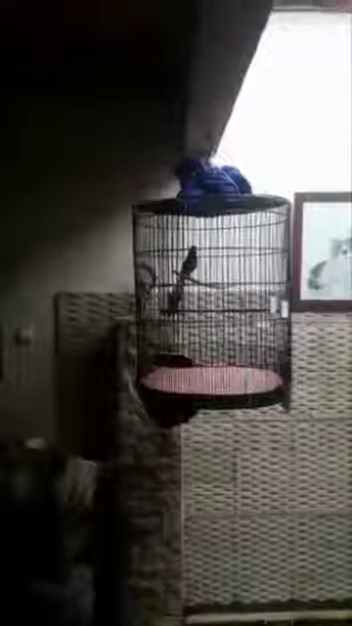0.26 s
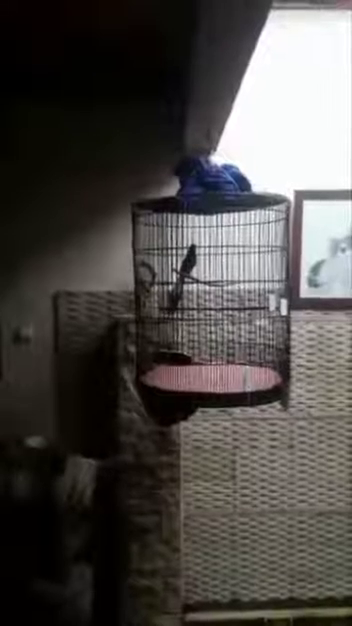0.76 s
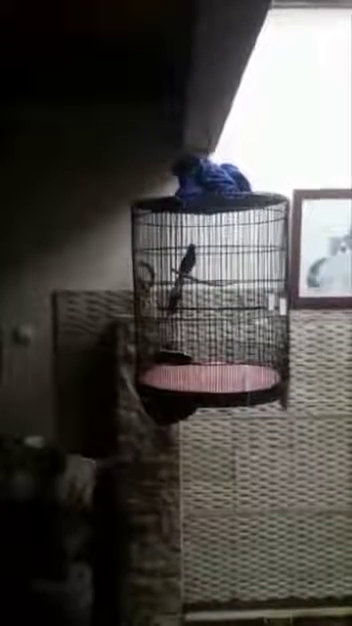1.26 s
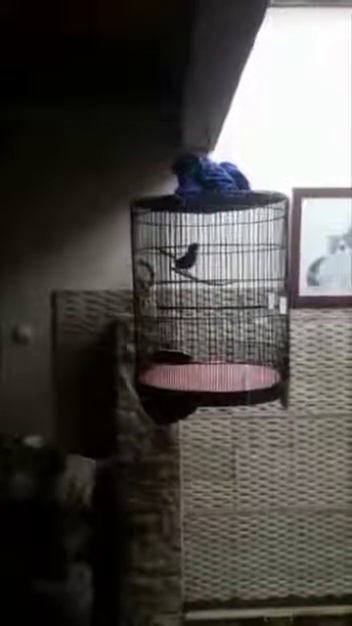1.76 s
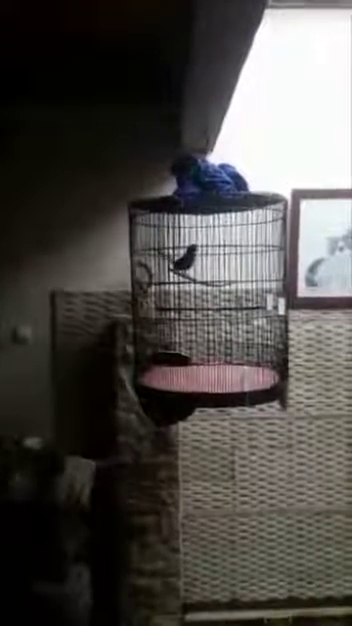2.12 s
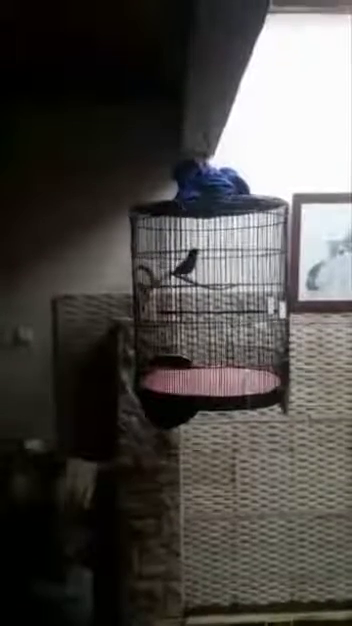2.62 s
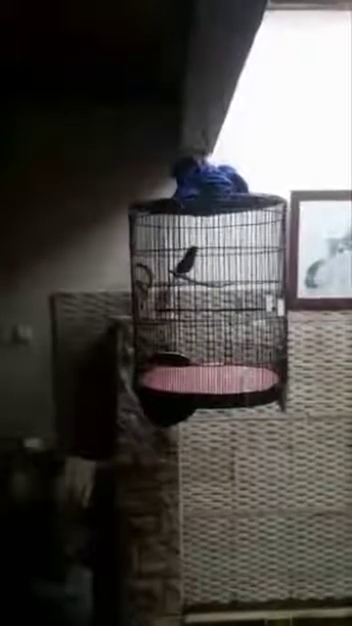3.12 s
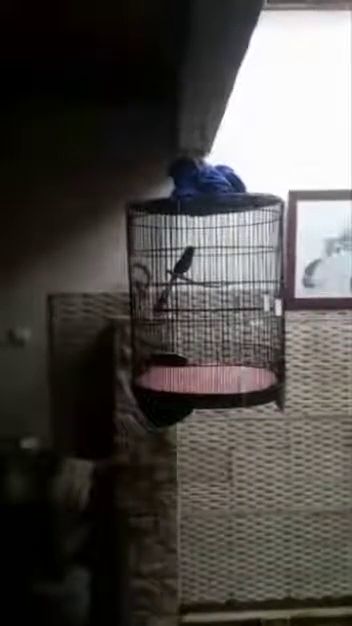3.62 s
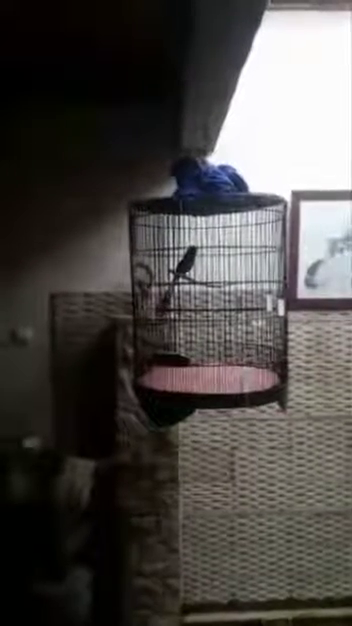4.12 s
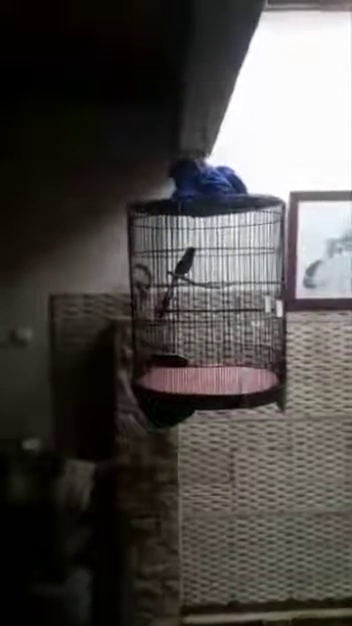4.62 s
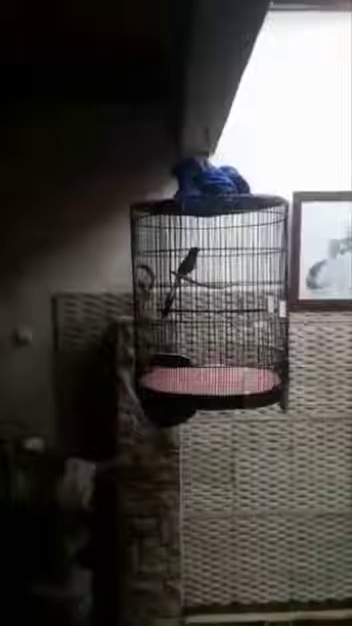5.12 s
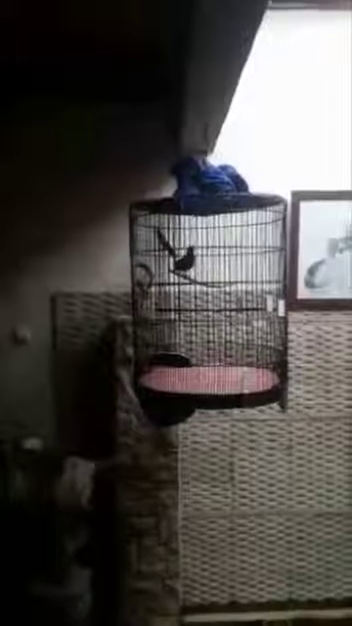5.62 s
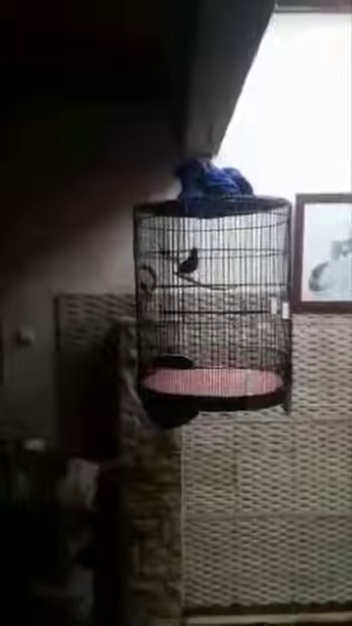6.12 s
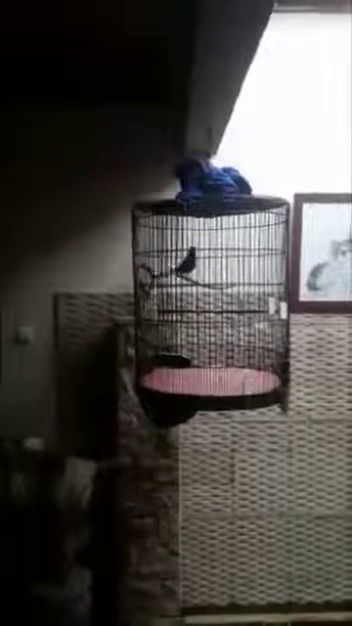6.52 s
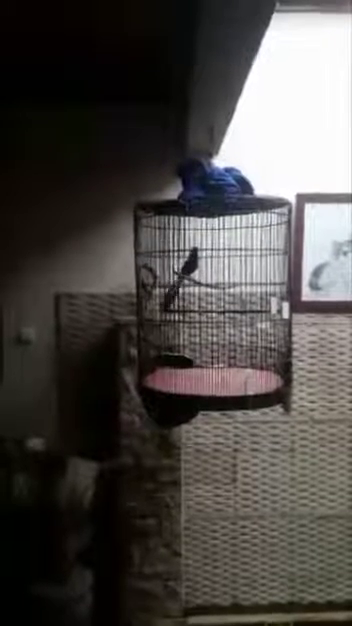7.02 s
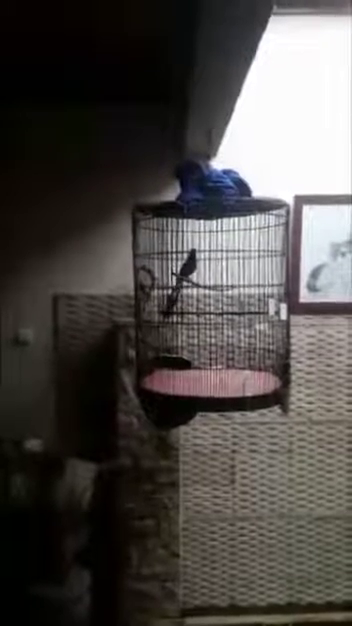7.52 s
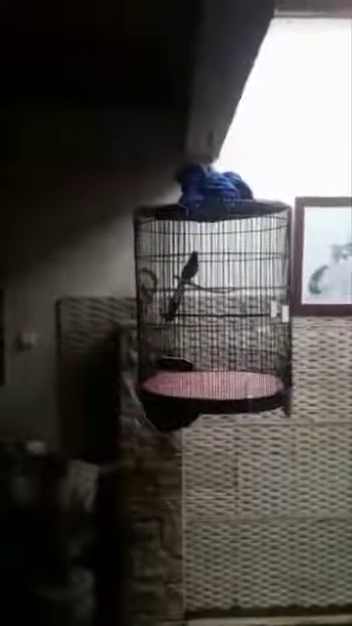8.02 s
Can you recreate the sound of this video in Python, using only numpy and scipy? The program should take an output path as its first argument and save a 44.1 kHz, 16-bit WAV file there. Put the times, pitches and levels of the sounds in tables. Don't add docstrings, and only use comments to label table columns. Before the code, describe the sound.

In a bare, echoing room a caged bird sings loudly, picked up by a phone across the room. From 0 to 1 s it gives rapid yodelling whistles, three arching, scooping, upward-leaping phrases. A short gap follows, with a wooden knock and faint distant bird notes. From 1.8 to 2.8 s comes a rattle of eleven bright chirps, about eleven a second, each falling steeply from high to middle pitch. Sliding whistles swoop and climb from 2.8 to 3.5 s, then quick leaping phrases run from 3.7 to 4.7 s, with a tiny click near 4.3. A dull perch knock lands at 5.1. A second rattle of twelve chirps fills 5.5 to 6.6 s. Swoops and yodels return from 6.7 to the end at about 8.3 s, with bright wire ticks around 7.7 and 8.2. Underneath lie soft hiss, low household hum, a very faint whine, traffic and a distant engine changing speed.

```python
import sys
import numpy as np
from scipy import signal
from scipy.fft import rfft, irfft, next_fast_len
from scipy.io import wavfile
from scipy.ndimage import uniform_filter1d, minimum_filter1d, map_coordinates

SR = 44100
rng = np.random.default_rng(int(sys.argv[2]) if len(sys.argv) > 2 else 0)


def natural_amplitude(level_db):
    exponent = np.asarray(level_db, float) / 20
    return 10 ** exponent


def store_wav(level_fs):
    pcm = np.round(np.clip(np.atleast_2d(level_fs), -1, 1) * 32767)
    wavfile.write(sys.argv[1], SR, pcm.T.astype(np.int16))


N = 364266


def unit(x):
    return x / np.sqrt(np.mean(x ** 2) + 1e-20)


def along(points, hz):
    f, v = np.transpose(points)
    return np.interp(np.log(hz + 1), np.log(f + 1), v)


def coloured(x, points):
    m = next_fast_len(x.shape[-1] + 8192)
    gain = natural_amplitude(along(points, np.fft.rfftfreq(m, 1 / SR)))
    return irfft(rfft(x, m) * gain, m)[..., :x.shape[-1]]


def add(out, s, x):
    part = out[:, max(round(s * SR), 0):][:, :x.shape[1]]
    part += x[:, :part.shape[1]]


# (pitch [Hz], time to fade by 60 dB [s])
RING_TIME = [(200, 0.22), (1000, 0.6), (2500, 0.68), (5000, 0.61), (12000, 0.62)]
# (delay [s], level under the direct sound [dB])
WALL_ECHOES = [
    (.017, -5),
    (.038, -8),
]


def room(x, direct_db):
    noise = rng.standard_normal((2, 12001, 2)) @ [1, 1j]
    modes = unit(uniform_filter1d(rng.standard_normal(noise.shape[1]), size=12))
    hz, t, z = signal.stft(irfft(noise * natural_amplitude(2.5 * modes)), SR, nperseg=256)
    fade = natural_amplitude(-60 * t / along(RING_TIME, hz)[:, None])
    tail = signal.istft(z * fade, SR, nperseg=256)[1]
    t = np.arange(tail.shape[1]) / SR
    tail *= 1 - np.exp(-t / 0.0011)
    tail *= 1 + 0.58 * np.exp(-t / 0.099)
    tail /= np.linalg.norm(tail[0])
    tail[0, 0] = natural_amplitude(direct_db)
    for s, db in WALL_ECHOES:
        tail[0, round(s * SR)] += natural_amplitude(direct_db + db)
    return signal.fftconvolve(x[None], tail, axes=1)


# (multiple of the pitch, level [dB])
VOICE_OVERTONES = [(2, -43), (3, -52.5), (4, -56.5)]
# (pitch [Hz], level [dB])
VOICE_AIR = [(300, -46), (600, -61), (1500, -31), (3500, -26.5), (5000, -40), (7000, -38), (9000, -30.5),
             (11000, -42), (13000, -69.5)]


def syrinx(hz, db, edge, harsh_db=0, air_db=0):
    phase = 2 * np.pi * np.cumsum(hz) / SR
    t = np.arange(len(hz)) / SR
    fade = np.clip(np.minimum(t, t[-1] - t) / edge, 0, 1)
    flutter = 1 + 1.18 * unit(uniform_filter1d(rng.standard_normal(len(t)), size=60))
    upper = 0
    for k, level_db in VOICE_OVERTONES:
        upper = upper + natural_amplitude(level_db) * np.sin(k * phase) * (k * hz < SR / 2)
    air = coloured(rng.standard_normal(len(t)), VOICE_AIR)
    return natural_amplitude(db) * fade * (np.sin(phase) + natural_amplitude(harsh_db) * flutter * upper + natural_amplitude(air_db) * air)


# (share of length, pitch [Hz], level [dB])
PICKUP_SHAPE = [(0, 824, -3), (.4, 986, -2), (.75, 1057, -8.5), (1, 1502, -8)]
CRY_SHAPE = [(0, 2376, 2.5), (.28, 2877, -13), (.5, 3023, 0.5), (.7, 2770, -5), (1, 2910, -9)]
ARCH_SHAPE = [(0, 1212, -12), (.14, 1626, -16.5), (.19, 1709, -2.5), (.3, 1755, -5.5), (.5, 1619, -3),
              (.68, 1356, -4), (.85, 937, -14), (1, 820, -41)]
HOOK_SHAPE = [(0, 1560, 5.5), (.4, 1882, -3), (1, 1880, -9.5)]
SCOOP_SHAPE = [(0, 874.4, -26), (.6, 1339, -11.5), (1, 1520, -11)]
STEP_SHAPE = [(0, 878, -23), (.6, 1398, -11.5), (1, 1440, -14.5)]
LEAP_SHAPE = [(0, 1650, -18.5), (.08, 1744, -8), (.3, 2340, 1.5), (.55, 2595, -4), (1, 2721, -17)]
LEAN_SHAPE = [(0, 1413, -30), (.25, 1524, -3.5), (1, 1590, -1)]
SWOOP_SHAPE = [(0, 1690, -6.5), (.08, 1773, -2), (.25, 2940, -18.5), (.45, 2344, -1), (.7, 2080, -2.5),
               (1, 1918, -4.5)]
CLIMB_SHAPE = [(0, 861, -32.5), (.27, 934, -26), (.31, 1069, -8), (.7, 1100, -13), (.8, 1269, -15.5),
               (1, 1358, -22)]
DROP_SHAPE = [(0, 1503, -3), (.4, 1253, -10.5), (1, 860, -4.5)]
RISE_SHAPE = [(0, 798, 0.0088), (1, 1005, 0.038)]
FALL_SHAPE = [(0, 996.5, 0.0079), (1, 778.4, 0.0024)]
HOLD_SHAPE = [(0, 979.8, 0.02), (1, 999.2, 0.052)]
GRACE_SHAPE = [(0, 7420, -10.5), (1, 6590, 13)]
# (time [s], length [s], level [dB], top pitch [Hz], swell toward the end [dB])
PICKUPS_SUNG = [(0.095, 0.039, -31.5, 1525, 9), (0.102, 0.065, -35, 3010, 4), (3.724, 0.03, -35, 2016, 4),
                (7.568, 0.036, -30, 1564, 5.5), (7.569, 0.05, -36, 3060, -6)]
CRIES_SUNG = [(0.139, 0.0267, -8, 2910, -6.5)]
ARCHES_SUNG = [(0.267, 0.053, -8, 1746, -8.5), (.523, 0.035, -4, 1770, -14),
               (.779, 0.039, -7.5, 1737, -11.5), (3.884, 0.078, -9.5, 1761, -8),
               (7.75, .058, -10, 1721, -8), (8.026, 0.041, -8, 1708, -11.5)]
HOOKS_SUNG = [(4.352, 0.023, -15, 1986, -27.5), (4.553, 0.0356, -16.5, 1932, -6)]
SCOOPS_SUNG = [(0.326, 0.076, -10, 1527, -1), (.57, 0.05, -11.5, 1575, 2.2),
               (.822, 0.063, -20.5, 1532, 1.7), (7.808, 0.07, -15, 1477, 0.5),
               (8.068, 0.044, -12.5, 1535, -0.012)]
STEPS_SUNG = [(3.969, 0.029, -9, 1484, 8), (4.183, 0.044, -9, 1546, 2.5), (4.377, 0.037, -13, 1430, 8.4),
              (4.588, 0.027, -10, 1468, 6)]
LEAPS_SUNG = [(0.389, 0.077, -11.5, 2703, -6.5), (0.621, 0.096, -10, 2784, -3.5),
              (.866, 0.062, -11, 2740, 0), (4.024, 0.069, -16.5, 2564, 8.5), (4.227, 0.038, -12.5, 2727, 5),
              (4.427, 0.047, -18.5, 2526, 20.5), (4.638, 0.036, -10.5, 2716, -2),
              (7.873, 0.082, -14.5, 2558, 6), (8.113, 0.075, -9.5, 2740, -9.5)]
LEANS_SUNG = [(2.826, 0.082, -22.5, 1535, 5.5), (2.84, 0.068, -44, 3080, 8), (6.72, 0.18, -15.5, 1616, -3)]
SWOOPS_SUNG = [(2.914, .085, -13, 2918, 0.56), (6.832, 0.097, -14, 2920, 0.99)]
CLIMBS_SUNG = [(3.243, 0.15, -9.5, 1374, -4), (7.138, .155, -12, 1340, 2.5)]
DROPS_SUNG = [(3.472, 0.043, -24.5, 1552, 0.15), (7.361, 0.051, -27.5, 1481, -1.7)]
RISES_SUNG = [(3.058, .041, -36, 1550, 23), (3.33, 0.036, -34, 2297, 0.5), (3.699, 0.019, -28.5, 980, -3),
              (3.7, .035, -40, 1990, 3), (7.62, .022, -16.5, 3117, 8)]
FALLS_SUNG = [(0, 0.012, -28.5, 1374, 3), (0, 0.011, -35, 2270, -7), (2.985, .035, -20, 2050, 0),
              (4.36, 0.026, -24.5, 2110, -1), (6.994, .03, -10, 2231, -6), (7.083, 0.019, -9, 2095, -9.5),
              (7.642, 0.015, -12, 3097, -11)]
HOLDS_SUNG = [(.176, 0.019, -8, 2665, 1), (.24, 0.013, -18.5, 2580, 1), (2.962, 0.024, -18, 2237, -4.5),
              (4.578, 0.012, -17, 1890, -3.5), (2.72, 0.0074, -44.5, 3110, 11),
              (2.866, 0.014, -39.5, 892, -7), (3.166, .014, -14.5, 1740, 5), (3.179, 0.0099, -17, 1862, -1),
              (3.747, .011, -11, 2578, -6), (3.757, .014, -16.5, 3048, 0.5),
              (3.773, 0.016, -10.5, 2986, 1.5), (3.781, 0.012, -28, 2340, 5), (3.798, .013, -3, 2591, -6),
              (6.772, 0.052, -51, 3220, -2), (7.082, .013, -25, 1559, 1.5), (7.196, 0.0285, -48.5, 731, 0),
              (7.639, 0.061, -17.5, 2260, -17), (7.656, 0.02, -7.5, 2543, 2), (7.64, 0.014, -34.5, 4530, 3),
              (7.645, 0.023, -42, 6640, -3), (7.64, 0.026, -47, 8880, -5), (8.145, 0.022, -52, 5180, -4),
              (.155, 0.024, -14, 2840, -2), (4.146, .045, -14, 1815, -1.5), (1.788, 0.0076, -20.5, 6160, 2),
              (5.517, .008, -21, 6140, 0)]
GRACES_SUNG = [(2.392, 0.044, -51, 7480, -4), (2.45, 0.027, -54, 7450, -13),
               (5.69, 0.038, -33.5, 6890, 2.5), (5.791, 0.019, -50, 7430, 2),
               (5.867, 0.045, -41.5, 7320, -18), (1.89, 0.023, -45, 6850, -8), (6.07, .03, -48, 7100, -12),
               (6.529, .04, -49, 6885, -11), (6.64, .02, -53.5, 6950, -13.5)]


def whistles(out):
    song = [(PICKUP_SHAPE, PICKUPS_SUNG), (CRY_SHAPE, CRIES_SUNG), (ARCH_SHAPE, ARCHES_SUNG),
            (HOOK_SHAPE, HOOKS_SUNG), (SCOOP_SHAPE, SCOOPS_SUNG), (STEP_SHAPE, STEPS_SUNG),
            (LEAP_SHAPE, LEAPS_SUNG), (LEAN_SHAPE, LEANS_SUNG), (SWOOP_SHAPE, SWOOPS_SUNG),
            (CLIMB_SHAPE, CLIMBS_SUNG), (DROP_SHAPE, DROPS_SUNG), (RISE_SHAPE, RISES_SUNG),
            (FALL_SHAPE, FALLS_SUNG), (HOLD_SHAPE, HOLDS_SUNG), (GRACE_SHAPE, GRACES_SUNG)]
    for shape, syllables in song:
        share, shape_hz, shape_db = np.transpose(shape)
        for s, length, db, top_hz, swell_db in syllables:
            u = np.arange(0, 1, 1 / (length * SR))
            glide = uniform_filter1d(np.interp(u, share, shape_hz), size=180) * top_hz / shape_hz.max()
            quaver = unit(uniform_filter1d(rng.standard_normal(len(u)), size=150))
            glide *= 1 + 0.0063 * quaver
            level_db = db + swell_db * u + np.interp(u, share, shape_db)
            harsh_db = min(1.86 * (level_db.max() + 10.5), 14.5)
            note = syrinx(glide, level_db + 8.0, edge=0.0015, harsh_db=harsh_db)
            add(out, s, room(note, direct_db=-8))


# (time [s], peak level [dB], length [s], swell toward the bottom [dB], bottom pitch [Hz])
RATTLE_BOUTS = [
    [(1.79, -12, 0.024, -8, 3620), (1.892, -11.5, .027, 1, 3605), (1.997, -10, .025, 4, 3790),
     (2.0794, -10, .024, 5.5, 3800), (2.168, -11.5, .028, 6.5, 3740), (2.262, -7.5, 0.019, 0, 3725),
     (2.347, -10.5, .035, -1.5, 3650), (2.4427, -9.5, .029, 1.5, 3680), (2.532, -8.5, 0.02, 3, 3670),
     (2.617, -11.5, .032, 2, 3690), (2.731, -17, 0.035, 7.5, 3770)],
    [(5.518, -8, 0.028, -8, 3720), (5.6246, -10.5, 0.019, -1, 3850), (5.714, -7, 0.025, -6, 3330),
     (5.806, -13.5, 0.031, 5, 3900), (5.894, -10, 0.025, 4.5, 3765), (5.983, -8, .024, 3, 3790),
     (6.068, -11.5, .03, 5, 3757), (6.171, -9, .022, 2.5, 3844), (6.268, -8, .023, 1, 3566),
     (6.356, -9, 0.026, 0, 3870), (6.451, -8, .024, 4, 3794), (6.562, -11.5, .025, 4.5, 3810)],
]
# (share of length, share of pitch range, level [dB])
CHIRP_SHAPE = [(-.35, 0.97, -26), (-.1, .93, -2), (.05, .85, 0.5), (.3, .58, 2.5), (.55, .36, -1),
               (.85, .22, -6.5), (1.15, .06, -15.5), (1.5, -0.14, -27.5)]
BOUT_TOP_HZ, SAG_HZ_PER_S = [6400, 6516], [190, 330]


def rattle(out):
    share, height, shape_db = np.transpose(CHIRP_SHAPE)
    for bout, first_hz, sag in zip(RATTLE_BOUTS, BOUT_TOP_HZ, SAG_HZ_PER_S):
        for s, db, length, swell_db, bottom_hz in bout:
            u = np.arange(share[0], share[-1], 1 / (length * SR))
            top_hz = first_hz - sag * (s - bout[0][0])
            fall = uniform_filter1d(np.interp(u, share, height), size=120)
            hz = bottom_hz + (top_hz - bottom_hz) * fall
            level_db = db - 2.5 + swell_db * u + np.interp(u, share, shape_db)
            chirp = syrinx(hz, level_db, edge=0.0009, harsh_db=9.5, air_db=1.5)
            add(out, s + share[0] * length, room(chirp, direct_db=-15))


# (time [s], dull level [dB],
# bright level [dB], tilt [dB per octave])
CAGE_KNOCKS = [(0.145, -44, -14, 6), (0.327, -29.5, -27, -6), (0.844, -35.5, -25, -10.5),
               (1.331, -30, -34, -8), (1.626, -34, -16.5, 3.5), (1.794, -44.5, -24.5, -14),
               (1.937, -34, -34, -5.5), (2.639, -37.5, -100, 5.5), (3.748, -26.5, -28, 5),
               (3.86, -44, -62, -15.5), (5.07, -14.5, -42.5, -4), (7.313, -35, -1, 5.5)]
# (pitch [Hz], level [dB per Hz])
DULL_WOOD = [(70, -43), (150, -22.5), (400, -18), (700, -4.5), (1200, -4), (2000, -7.5), (3500, -21),
             (7300, -28), (8200, -58)]
# (pitch [Hz], level [dB per Hz])
BRIGHT_WIRE = [(1500, -36), (2500, -3), (4000, -5.5), (5000, -0.5), (7200, -3.5), (9000, -17),
               (11000, -22.5), (13500, -62.5)]


def knocks(out):
    t = np.arange(SR // 12) / SR - .02
    for s, db, bright_db, tilt_db in CAGE_KNOCKS:
        click = np.zeros(len(t))
        click[np.argmax(t >= 0)] = 1
        thud = coloured(unit(coloured(click, DULL_WOOD)), [(125, -3 * tilt_db), (8000, 3 * tilt_db)])
        fade = natural_amplitude(bright_db + 35.0 - 60 * t / 0.026) * (t >= 0)
        tick = unit(coloured(rng.standard_normal(len(t)), BRIGHT_WIRE)) * fade
        add(out, s + t[0], room(natural_amplitude(db - 12) * (thud + tick), direct_db=-11))


# (time [s], level [dB])
WIRE_TICKS = [
    (7.557, -32),
    (7.638, -19.5),
    (7.741, -18),
    (7.746, -12),
    (7.756, -18.5),
    (8.223, -21),
    (8.23, -8),
    (8.239, -14),
]
# (pitch [Hz], level [dB per Hz])
WIRE_COLOUR = [(2500, -35), (4000, -12.5), (5000, 1.5), (6000, -1.5), (7200, 3), (9000, -12),
               (11000, -12.5), (12200, -32), (13500, -56)]


def wires(out):
    t = np.arange(SR // 30) / SR
    for s, db in WIRE_TICKS:
        fade = natural_amplitude(db - 60 * t / 0.011)
        tick = unit(coloured(rng.standard_normal(len(t)), WIRE_COLOUR)) * fade
        add(out, s, room(tick, direct_db=-7))


# (time [s], peak level [dB], pitch [Hz])
FAR_NOTES = [(1.245, -40.5, 1549), (1.625, -47.5, 1504), (1.747, -47, 391), (1.851, -45.5, 1393),
             (2.2, -47, 1050), (2.224, -50, 1480), (2.254, -42, 807.8), (2.449, -51, 1410),
             (2.509, -44.5, 1079), (5.714, -44, 1427), (5.95, -45, 903), (6.306, -46, 828)]


def far_calls(out):
    for s, db, hz in FAR_NOTES:
        glide = hz * np.linspace(1.04, .96, num=SR // 30)
        add(out, s, room(syrinx(glide, db - 5.0, edge=0.0022), direct_db=5.0))


def patchy(x, depth_db):
    z = signal.stft(x, nperseg=512)[2]
    field = uniform_filter1d(rng.standard_normal(z.shape[1:]), size=6, axis=0)
    field = uniform_filter1d(field, size=16, axis=1)
    return signal.istft(z * natural_amplitude(depth_db * unit(field)), nperseg=512)[1][:, :N]


# (time [s], level [dB])
INDOOR_BUSTLE = [(0.0, -50), (1.66, -52.5), (1.89, -47.5), (2.46, -55), (4.0, -48), (4.3, -52), (5.02, -49),
                 (5.89, -50), (6.1, -46.5), (6.99, -51), (7.2, -46), (7.43, -51), (7.82, -47.5),
                 (8.26, -56)]
# (time [s], swing [dB])
STREET = [(0, 2), (1.55, -3.5), (1.85, 3), (3.3, 2.5), (3.9, 5), (4.9, 1.5), (6.1, 4), (6.9, -3.5),
          (7.3, 2), (8.26, 2)]
# (pitch [Hz], level [dB per Hz])
HUM_COLOUR = [(53, -29), (90, -17), (118, 2.5), (167, 6.5), (202, 2.5), (258, -2.5), (415, -5),
              (500, -12.5), (650, -52), (1100, -120)]
# (pitch [Hz], level [dB per Hz])
TRAFFIC_COLOUR = [(13, -56.5), (22, -6.5), (27, -19), (43, -31.5), (115, -4.5), (150, -21.5), (250, -120)]
# (pitch [Hz], level [dB per Hz])
HISS_COLOUR = [(200, -51), (300, -12), (700, -9.5), (1200, -6), (1800, -7), (2800, -15), (4200, -14),
               (5700, -16), (7300, -24.5), (9000, -36), (13000, -45)]
# (pitch [Hz], level [dB])
APPLIANCE_WHINE = [(8608, -81), (12920, -84)]
HUM_DB, TRAFFIC_DB, HISS_DB = -3, -63.5, -50.5
TRAFFIC_FOLLOWS = 0.44


def household():
    t = np.arange(N) / SR
    bustle_db = np.interp(t, *np.transpose(INDOOR_BUSTLE))
    street_db = np.interp(t, *np.transpose(STREET))
    waver, drift = (map_coordinates(knots, [t * 9]) for knots in rng.standard_normal((2, 80)))
    hum = unit(coloured(rng.standard_normal(N), HUM_COLOUR))
    hum *= natural_amplitude(HUM_DB + bustle_db + 0.81 * waver)
    traffic = unit(coloured(rng.standard_normal(N), TRAFFIC_COLOUR))
    traffic *= natural_amplitude(TRAFFIC_DB + TRAFFIC_FOLLOWS * street_db)
    hiss = unit(patchy(coloured(rng.standard_normal((2, N)), HISS_COLOUR), depth_db=2.5))
    hiss = hiss * natural_amplitude(HISS_DB + street_db + 1.5 * drift)
    whine = sum(natural_amplitude(db + 4.5) * np.sin(2 * np.pi * hz * t) for hz, db in APPLIANCE_WHINE)
    return hiss + hum + traffic + whine + engine()


# (time [s], firing rate [Hz], level [dB])
ENGINE_SPEED = [(0.0, 39.6, -53), (0.3, 42, -60), (0.71, 44.4, -57), (0.959, 40.5, -59),
                (1.679, 40.97, -60), (2.11, 33.24, -59.5), (2.35, 28.46, -57.5), (3.4, 24.6, -59),
                (4.229, 28.55, -69), (4.69, 32.42, -58.5), (4.78, 30.43, -65), (5.17, 33.6, -53),
                (5.5, 38.5, -60.5), (6.99, 40.24, -56), (7.08, 41.5, -52.5), (8.26, 42.65, -58)]
# (multiple of the firing rate, level [dB])
ENGINE_TONES = [(2, -18), (3, 0), (4, 0.5), (5, 0.5), (6, -9), (7, -8), (8, -8.5)]


def engine():
    t = np.arange(N) / SR
    s, firing_hz, level_db = np.transpose(ENGINE_SPEED)
    knots = rng.standard_normal((1 + len(ENGINE_TONES), 40))
    wander, *swings = (map_coordinates(row, [t * 4]) for row in knots)
    speed = np.interp(t, s, firing_hz) * (1 + .006 * wander)
    phase = 2 * np.pi * np.cumsum(speed) / SR
    tones = 0
    for (k, db), swing in zip(ENGINE_TONES, swings):
        tones = tones + natural_amplitude(db + 4 * swing) * np.sin(k * phase + k * k)
    return natural_amplitude(np.interp(t, s, level_db) + 1.5) * tones


# (pitch [Hz], side level under the middle [dB])
WIDTH = [(3900, -60), (4300, -6), (9000, -5), (13000, -11)]


def scene():
    pair = household()
    for source in (whistles, rattle, knocks, wires, far_calls):
        layer = np.zeros((2, N))
        source(layer)
        pair = pair + layer
    side = coloured(pair[1], WIDTH)
    return np.array([pair[0] + side, pair[0] - side])


# (low [Hz], high [Hz], loud low [Hz], loud high [Hz], level under it [dB])
LOST_BANDS = [(6700, 7000, 4500, 6400, -29), (7000, 7400, 4500, 6400, -31), (7400, 8200, 4500, 6400, -33),
              (8200, 8750, 4500, 6400, -37), (3000, 3300, 2200, 2900, -38), (3300, 3650, 2200, 2900, -40),
              (7750, 8150, 8450, 9100, -8), (9200, 9500, 8450, 9100, -5), (5700, 6050, 4900, 5500, -10),
              (11100, 11300, 11800, 12500, -9)]


def starve(x):
    hz, _, z = signal.stft(x, SR, nperseg=1024)

    def power(low, high):
        band = np.abs(z[:, (hz >= low) & (hz < high)]) ** 2
        return uniform_filter1d(np.mean(band, axis=(0, 1)), size=5)

    kept = np.ones(z.shape[1:])
    for low, high, loud_low, loud_high, db in LOST_BANDS:
        kept[(hz >= low) & (hz < high)] = power(low, high) > power(loud_low, loud_high) * natural_amplitude(2 * db)
    return signal.istft(z * kept, SR, nperseg=1024)[1][:, :N]


def roll_off(x):
    return signal.sosfilt(signal.butter(12, 15800, fs=SR, output="sos"), x)


# (pitch [Hz], gain [dB])
PHONE_COLOUR = [(6500, -2.5), (7400, -2.5), (7750, -12.5), (8150, -15.5), (8500, -4), (9600, -9),
                (10200, -12.5), (11000, -8.5), (12200, 4.5), (13000, -13.5), (13400, -36.5)]
# (time [s], level [dB])
SKIPS = [
    (4.2788, -10),
]


def record(dry):
    x = coloured(dry, PHONE_COLOUR)
    needed = np.minimum(1, .86 / (np.abs(x).max(axis=0) + 1e-9))
    gain = uniform_filter1d(minimum_filter1d(needed, size=441), size=441)
    x = starve(x * gain)
    t = np.arange(40) / SR
    skip = np.cos(2 * np.pi * 3000 * t) * np.exp(-t / .00015)
    for s, db in SKIPS:
        x[:, round(s * SR):][:, :len(skip)] += natural_amplitude(db) * skip
    return roll_off(x)


dry = scene()
out = record(dry)
store_wav(out)
```